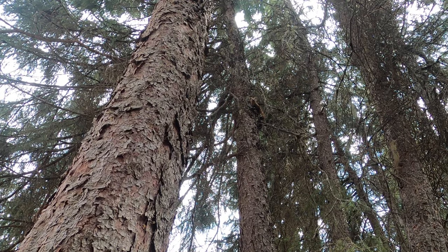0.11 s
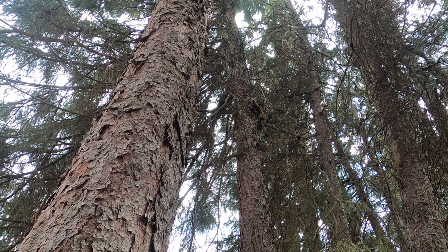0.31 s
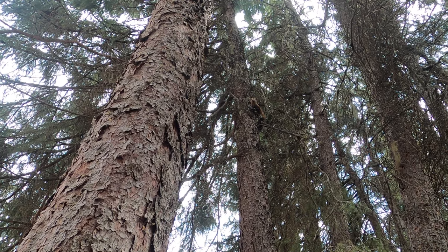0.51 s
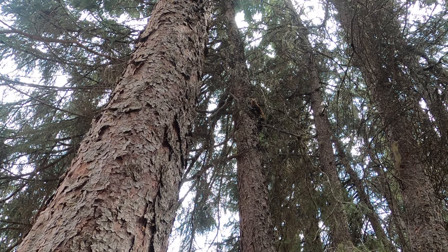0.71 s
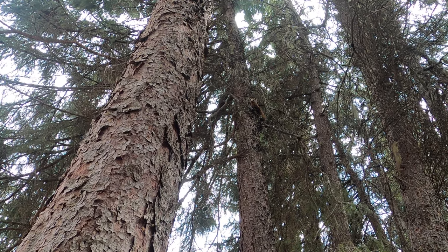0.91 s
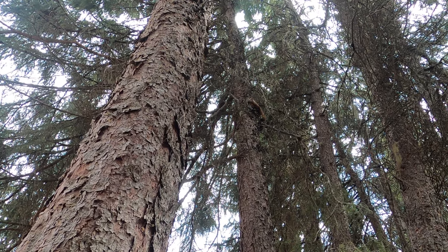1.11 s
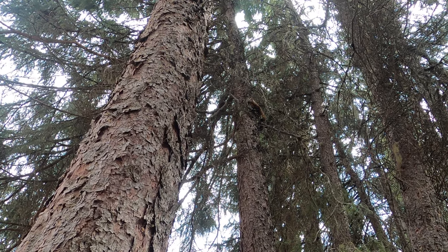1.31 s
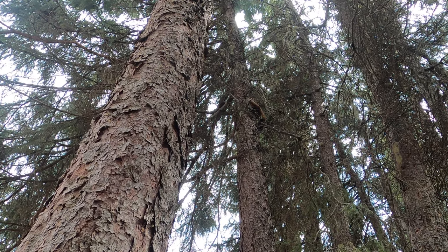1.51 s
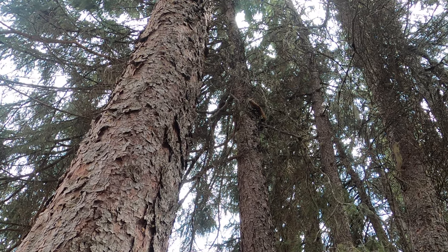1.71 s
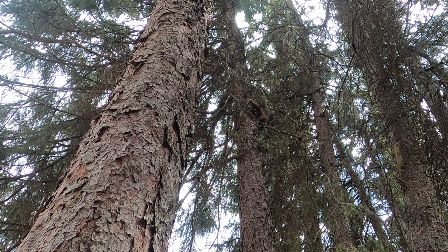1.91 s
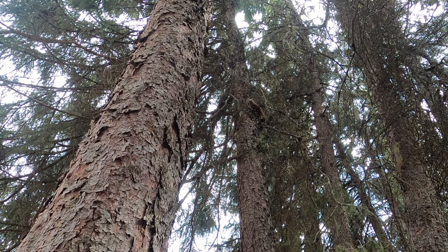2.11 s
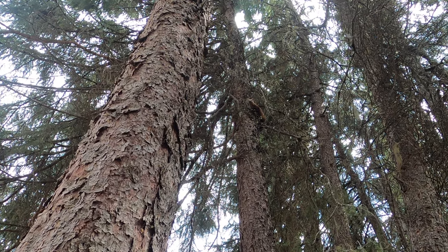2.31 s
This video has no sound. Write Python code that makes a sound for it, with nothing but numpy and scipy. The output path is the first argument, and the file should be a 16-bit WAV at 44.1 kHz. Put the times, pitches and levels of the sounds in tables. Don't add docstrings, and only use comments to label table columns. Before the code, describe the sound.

Gusty wind rumbles in low puffs against the microphone while tall conifers hiss softly behind

```python
import sys
import numpy as np
from scipy import signal
from scipy.fft import rfft, irfft, next_fast_len
from scipy.io import wavfile
from scipy.ndimage import uniform_filter1d, map_coordinates

SR = 44100
rng = np.random.default_rng(int(sys.argv[2]) if len(sys.argv) > 2 else 0)


def boost_factor(decibels):
    exponent = np.asarray(decibels, float) / 20
    return 10 ** exponent


def to_wav(sig):
    pcm = np.clip(np.atleast_2d(sig), -1, 1) * 32767
    pcm = np.round(pcm).astype(np.int16)
    wavfile.write(sys.argv[1], SR, pcm.T)


N = 103635


def unit(x):
    return x / np.sqrt(np.mean(x ** 2) + 1e-20)


def along(points, hz):
    f, v = np.transpose(points)
    return np.interp(np.log(hz + 1), np.log(f + 1), v)


def curve(rows):
    return np.interp(np.arange(N) / SR, *np.transpose(rows))


def wobble(rate_hz):
    return map_coordinates(rng.standard_normal(size=400), [np.arange(N) * rate_hz / SR])


def filtered(x, response):
    m = next_fast_len(N + SR // 2)
    return irfft(rfft(x, m) * response(np.fft.rfftfreq(m, 1 / SR)), m)[..., :N]


def rush(spectrum, patchy_db, alike):
    # frequency in Hz, correlation.
    likeness = [(60, 0.07), (140, 0.08), (350, 0.55), (840, 0.59), (2010, 0.57), (4840, 0.33)]
    # frequency in Hz, left over right in dB.
    lean = [(300, -1), (700, -1.2), (1400, 1), (2800, 4), (5500, -1), (10000, -0.5)]
    lag_s = 2.5e-5
    z = signal.stft(rng.standard_normal((2, N)), nperseg=512)[2]
    field = uniform_filter1d(rng.standard_normal(z.shape[1:]), size=6, axis=0)
    field = uniform_filter1d(field, size=10, axis=1)
    pair = signal.istft(z * boost_factor(patchy_db * unit(field)), nperseg=512)[1][:, :N]

    def mid_side(hz):
        angle = np.arccos(np.clip(alike * along(likeness, hz), -1, 1)) / 2
        return boost_factor(along(spectrum, hz)) * [np.cos(angle), np.sin(angle)]

    mid, side = filtered(pair, mid_side)
    way = np.array([[.5], [-.5]])

    def lean_and_lag(hz):
        return boost_factor(way * along(lean, hz)) * np.exp(-2j * np.pi * hz * way * lag_s)

    return unit(filtered([mid + side, mid - side], lean_and_lag))


def crowns():
    # frequency in Hz, density in dB per Hz.
    needles = [(60, -65), (110, -9.5), (400, -10.5), (800, -9), (1100, -2), (2000, -3.5), (4500, -16),
               (7000, -28.5), (10000, -50), (16000, -78)]
    # time in seconds, level in dB.
    crown = [(0.0, -59.5), (0.29, -58.5), (1.35, -59.5), (2.35, -59)]
    # frequency in Hz, level in dB.
    twigs = [(3500, -27), (5500, 5.5), (7500, 0), (9000, -4.5), (11000, -10.5), (13000, -12),
             (14200, -42.5)]
    # time in seconds, level in dB.
    rustle = [(0, -81.5), (.15, -76), (.27, -72), (.4, -82), (.65, -81), (.83, -83), (.95, -94),
              (1.17, -78), (1.4, -105), (1.6, -77.5), (1.72, -89.5), (2.08, -103), (2.24, -75.5),
              (2.35, -94)]
    far_db = curve(crown) + 1.5 + 0.33 * wobble(21)
    hiss = boost_factor(far_db) * rush(needles, patchy_db=0.91, alike=1.32)
    near_db = curve(rustle) - 1.5 + 1.8 * wobble(14)
    return hiss + boost_factor(near_db) * rush(twigs, patchy_db=1.5, alike=0.32)


def bird():
    # start in seconds, top pitch in Hz, level in dB.
    chips = [
        (.465, 3970, -48.5),
        (1.655, 4026, -47.5),
    ]
    chip_s, arch, right_db = .019, .1, -15
    lead_s, lead_db, lead_from_hz, lead_to_hz = .025, -21, 4200, 6500
    slap_s, slap_db = .063, -21
    echo_db, echo_t60_s, echo_width_hz = -22, .55, 110
    out, t = np.zeros((2, N + SR)), np.arange(SR // 2) / SR
    u = np.linspace(0, 1, int(chip_s * SR))
    shape = np.sin(np.pi * u) ** .5

    def add(start_s, sound):
        out[:, int(start_s * SR):][:, :sound.shape[-1]] += sound

    for s, hz, db in chips:
        chip_hz = hz * (1 - arch * (2 * u - 1) ** 2)
        chip = boost_factor(db) * shape * np.sin(2 * np.pi * np.cumsum(chip_hz) / SR)
        lead_hz = lead_from_hz + (lead_to_hz - lead_from_hz) * u
        lead = boost_factor(db + lead_db) * shape * np.sin(2 * np.pi * np.cumsum(lead_hz) / SR)
        add(s, chip * boost_factor([[0], [right_db]]))
        add(s - lead_s, lead * boost_factor([[0], [-4]]))
        add(s + slap_s, chip * boost_factor(slap_db))
        tail = rng.standard_normal((2, len(t))) * boost_factor(-60 * t / echo_t60_s) * (t > .008)
        tail = filtered(tail, lambda f: 1 / (1 + 1j * (f - hz) / echo_width_hz))[:, :len(t)]
        echo = signal.fftconvolve(chip[None], tail / np.linalg.norm(tail[0]), axes=1)
        add(s, boost_factor(echo_db) * echo)
    return out[:, :N]


def ticks():
    # start in seconds, level in dB, left over right in dB.
    snaps = [
        (0.264, -52, 14.5),
        (0.322, -79, 9),
        (0.343, -81, 8),
        (.411, -75, 12),
        (0.751, -88, -1),
        (.836, -68.5, 17),
        (1.609, -66.5, 13),
        (2.245, -80, 12),
    ]
    # frequency in Hz, level in dB.
    snap_colour = [(3000, -29.5), (5200, 5), (7000, -12), (8700, 3.5), (10200, -14.5), (13000, -25.5),
                   (16000, -20.5)]
    t60_s = 0.015
    out, t = np.zeros((2, N)), np.arange(SR // 50) / SR
    for s, db, pan_db in snaps:
        burst = boost_factor(db + 12 - 60 * t / t60_s) * rng.standard_normal(len(t))
        out[:, int(s * SR):][:, :len(t)] += burst * boost_factor([[0], [-pan_db]])
    return filtered(out, lambda hz: boost_factor(along(snap_colour, hz)) * (hz > 2000))


def eddies(spectrum, gain):
    x = unit(filtered(rng.standard_normal(N), lambda hz: boost_factor(along(spectrum, hz))))
    x = x / (np.abs(signal.hilbert(x, next_fast_len(N))[:N]) + .35)
    return filtered(unit(x) * gain, lambda hz: boost_factor(np.minimum(along(spectrum, hz) + 10, 0) / 2))


def port(puffs):
    # frequency in Hz, level in dB.
    thud = [(15, -10), (28, -1), (40, 0), (55, -5), (80, -15), (130, -42), (200, -90)]
    roll = [(35, -30.5), (60, -2), (80, -3.5), (110, -7), (150, -16), (220, -39.5), (300, -96)]
    flap = [(70, -50.5), (120, -3.5), (150, 4), (200, -4.5), (260, -13), (340, -25), (500, -64)]
    lull_db = -62.5
    full_db, flutter_db = -18.5, 1.5
    s, db, bright_db, half_s = np.transpose(puffs)[:, :, None]
    swell = np.exp(-.5 * ((np.arange(N) / SR - s) / half_s) ** 2)

    def layer(extra_db):
        return (boost_factor(db + extra_db) * swell).sum(axis=0) * boost_factor(flutter_db * wobble(44.73))

    roll_db = 0.5 + 0.36 * (db - full_db) + 0.57 * bright_db
    flap_db = -7 + 0.91 * (db - full_db) + bright_db
    large = eddies(thud, layer(0) + boost_factor(lull_db))
    middle = eddies(roll, layer(roll_db) + boost_factor(lull_db - 5.5))
    return large + middle + eddies(flap, layer(flap_db))


def buffeting():
    # time in seconds, strength in dB, brightness in dB, half length in seconds.
    left_puffs = [(.25, -38, -13, 0.031), (.325, -44, -4.5, 0.011), (.44, -41, -19.5, 0.017),
                  (.5, -30.5, -18.5, 0.021), (.58, -51, -18, .015), (.715, -45.5, -2.5, 0.024),
                  (.8, -51.5, -2, 0.074), (.9, -52.5, -9.5, 0.034), (1.09, -51.5, -13.5, 0.057),
                  (1.25, -51, -14, 0.03), (1.37, -44, -12, 0.017), (1.455, -46, -10.5, 0.023),
                  (1.56, -44.5, -10, 0.054), (1.65, -46, -5, 0.013), (1.8, -49.5, -13, 0.072),
                  (2.0, -51, -14, 0.044), (2.075, -30, -19.5, 0.013), (2.34, -46.5, 0, 0.028)]
    right_puffs = [(.2, -44, 8.5, 0.022), (.25, -39, 3.5, 0.011), (.29, -40, 6, 0.02),
                   (.378, -46, 23.5, 0.0091), (.435, -30.5, 1, 0.0091), (.47, -29.5, -12, 0.025),
                   (.51, -30.5, -14.5, 0.01), (.58, -53, -25, 0.024), (.695, -29.5, -10.5, 0.017),
                   (.755, -38, -4.5, 0.012), (.802, -29, 15.5, 0.013), (.855, -32.5, 19.5, 0.015),
                   (.9, -27, 2, 0.021), (.99, -30, 2.5, 0.013), (1.06, -38, 11.5, 0.027),
                   (1.095, -31.5, 8, 0.0081), (1.16, -32.5, -12, 0.036), (1.228, -35.5, 5, .018),
                   (1.29, -40.5, -9, 0.013), (1.36, -33, -19, 0.021), (1.44, -27.5, -6, 0.0083),
                   (1.488, -36, 19, 0.017), (1.55, -27, 2, 0.011), (1.605, -26.5, -2, 0.018),
                   (1.655, -30, -1, .012), (1.742, -28, -1.5, 0.014), (1.82, -34.5, -9, 0.032),
                   (1.97, -33.5, -10, 0.032), (2.055, -30, -12.5, 0.023), (2.33, -42, 3.5, 0.0098)]
    cross_db, suck, low_cut_hz = -34.5, 1.8, 32
    left, right = port(left_puffs), port(right_puffs)
    both = np.array([left - boost_factor(cross_db) * right, right - boost_factor(cross_db) * left])
    bent = both + suck * both ** 2
    return filtered(bent, lambda hz: hz ** 2 / np.sqrt(hz ** 4 + low_cut_hz ** 4))


def scene():
    return crowns() + bird() + ticks() + buffeting()


def low_pass(x):
    return signal.sosfilt(signal.butter(12, 15500, fs=SR, output="sos"), x)


def record(dry):
    gap_s, gap_half_s, gap_db = 1.6835, .0032, -11
    dip = boost_factor(gap_db * np.exp(-.5 * ((np.arange(N) / SR - gap_s) / gap_half_s) ** 2))
    return low_pass(dry * dip)


dry = scene()
out = record(dry)
to_wav(out)
```